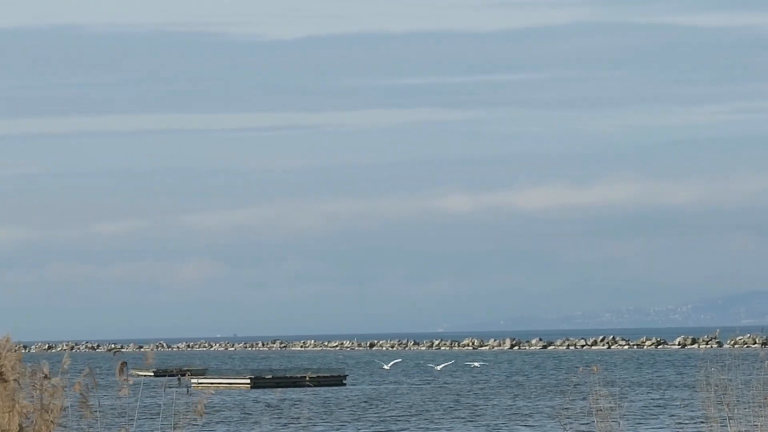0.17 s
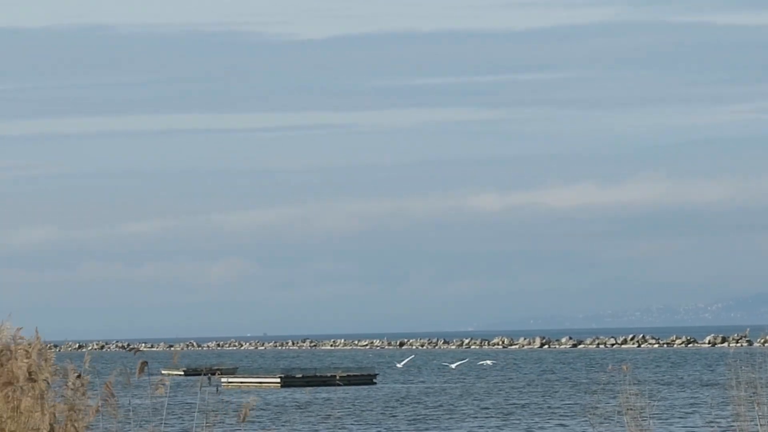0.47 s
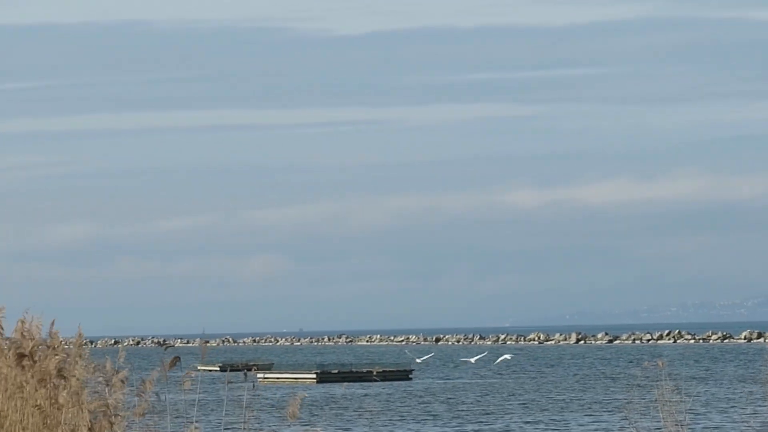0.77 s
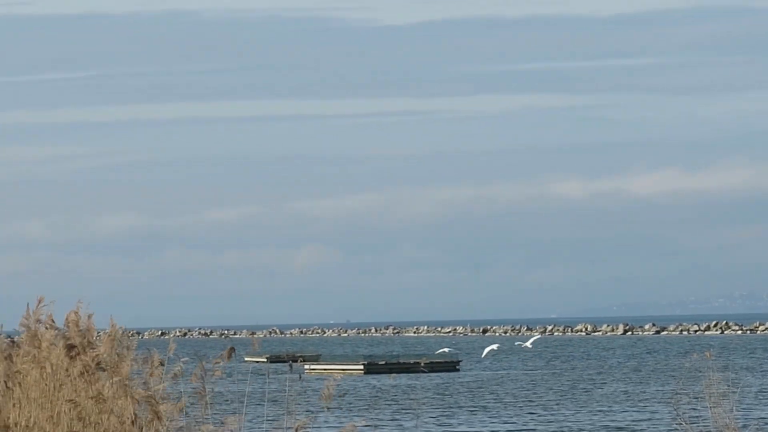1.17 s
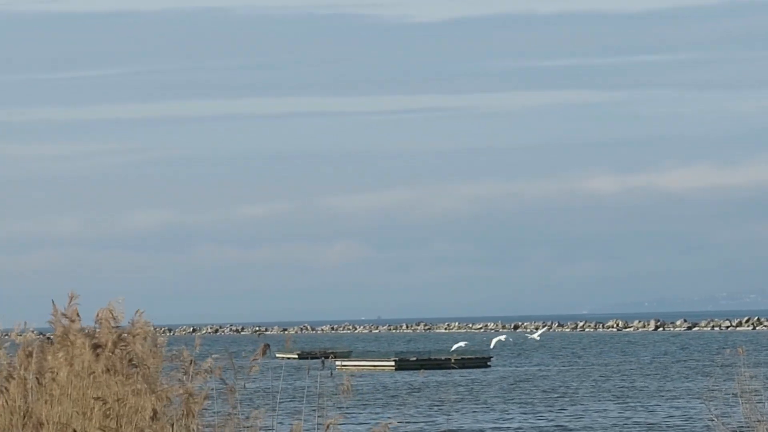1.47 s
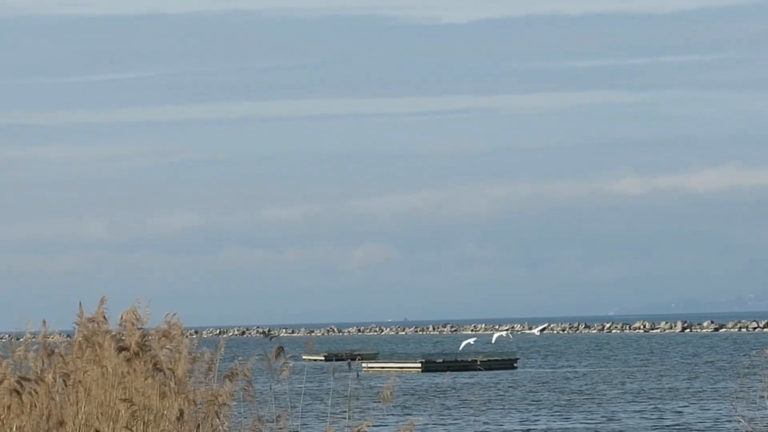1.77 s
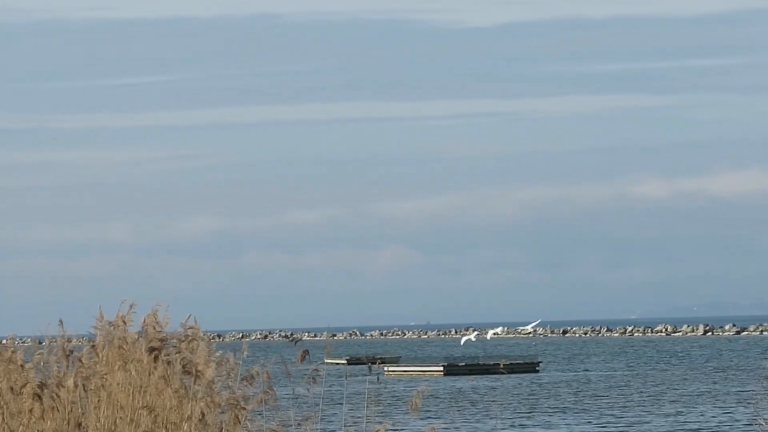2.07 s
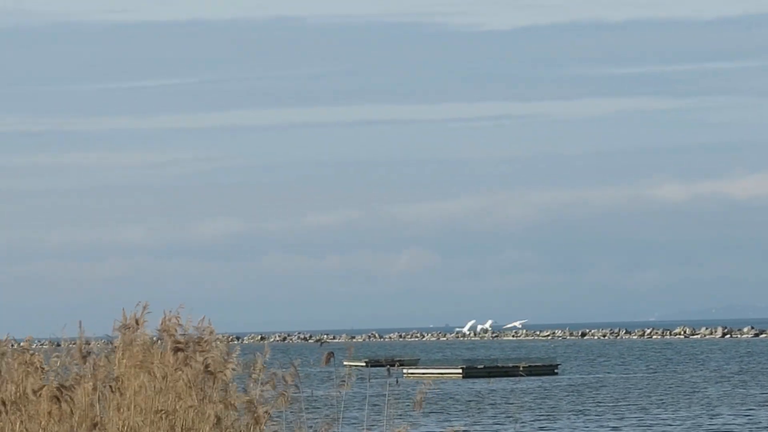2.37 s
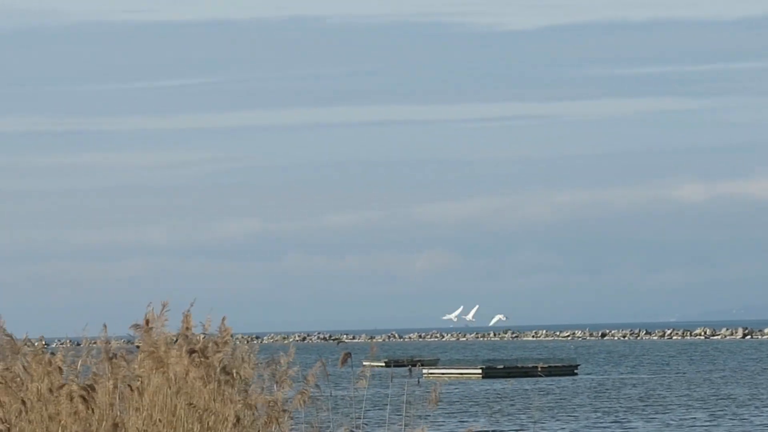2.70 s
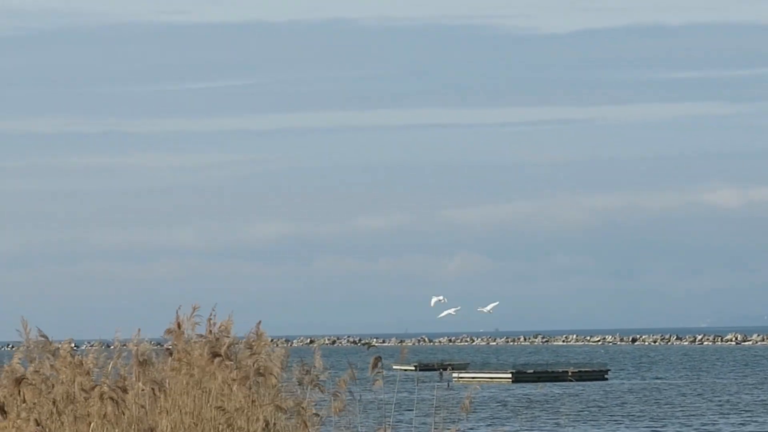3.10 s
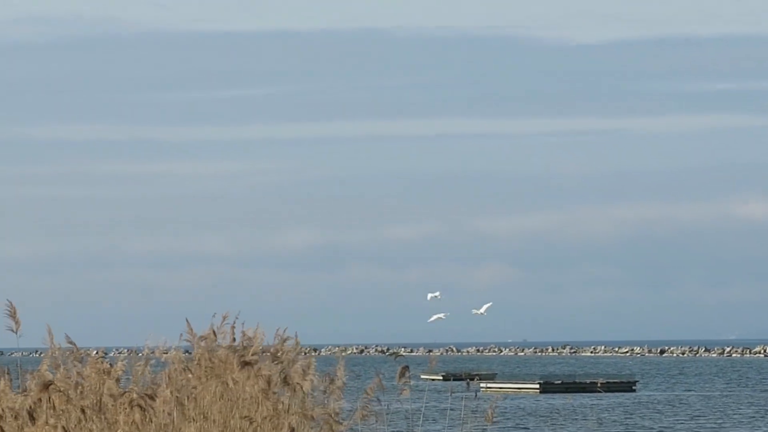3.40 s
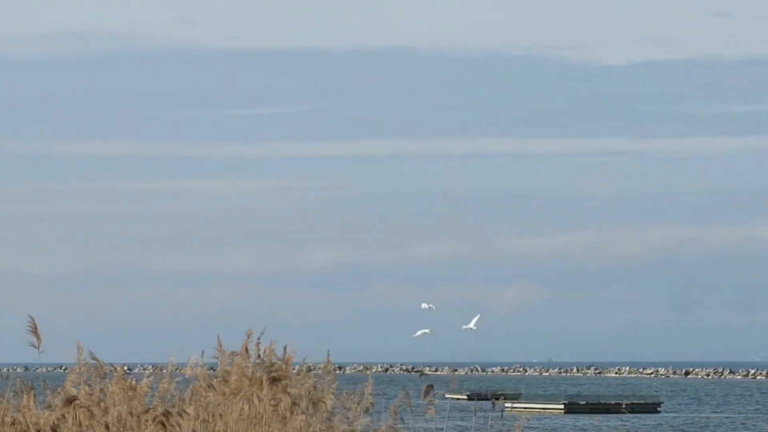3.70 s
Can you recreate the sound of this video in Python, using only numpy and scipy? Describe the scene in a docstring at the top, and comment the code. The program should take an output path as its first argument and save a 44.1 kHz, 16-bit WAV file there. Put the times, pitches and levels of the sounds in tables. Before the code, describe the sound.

Wind rumbles deep and unevenly on a close camera microphone at a lakeshore, thumping near 0.15, 1.0-1.25 and 2.9-3.2 seconds and easing between. Soft bubbling laps and light splashes continue over airy hiss. A far bird gives faint, single falling chips about every half second. A fine, rapid camera buzz persists, with small handling ticks and gritty lens whirs at 1.5 and 2.9-3.3 seconds.

```python
"""Light wind on a lake shore: eddies of shaped noise buffet the microphone, and strong gusts flutter and thump.
Small waves lap as a bubbling wash and splash noise; a far bird gives single chips, gliding pure tones.
The camera buzzes with fast bursts of tiny ticks that ring its body; twice its lens motor whirs, as gritty
noise, and the bursts double. A few soft handling ticks sound close by over steady air roar and hiss."""
import sys
import numpy as np
from scipy import signal
from scipy.fft import rfft, irfft, next_fast_len
from scipy.io import wavfile
from scipy.ndimage import uniform_filter1d, map_coordinates

SR = 44100
rng = np.random.default_rng(int(sys.argv[2]) if len(sys.argv) > 2 else 0)


def inscribe(sig):
    """Save sig as 16-bit PCM at rate SR to the path in sys.argv[1].

    A 1-D sig is mono; a 2-D sig holds one channel per row.
    Samples are clipped to [-1, 1] before scaling.
    """
    pcm = np.round(np.clip(np.atleast_2d(sig).T, -1, 1) * 32767)
    wavfile.write(sys.argv[1], SR, pcm.astype(np.int16))


N = 169785

# Even roar of the open air: (frequency [Hz], relative density [dB])
AIR_SPECTRUM = [(30, 1.5), (90, 0.5), (150, -1), (230, -12), (330, -12), (600, -22), (2000, -72)]
AIR_DB = -35
# Steady hiss of reeds and microphone: (frequency [Hz], relative density [dB])
HISS_SPECTRUM = [(300, -2), (2000, -11), (3000, 1.5), (3800, -0.5), (4500, 4), (5100, 4.5), (6000, 2.5),
                 (9500, 0), (12000, -2), (13300, 1), (14300, -23), (16000, -21)]
HISS_DB = -50.5

# Handling ticks: (time [s], level before rise and decay [dB], t60 [s])
HANDLING_TICKS = [(.152, -38, .08), (0.243, -31.5, 0.053), (.432, -38.5, .09), (.547, -36, 0.09),
                  (1.012, -37, .09), (1.252, -40, .06), (1.3443, -31.5, 0.041), (1.473, -36, .06),
                  (1.503, -34, .08), (1.543, -29, 0.042), (1.8, -36, 0.075), (1.883, -35.5, .08),
                  (2.3256, -38.5, .09), (2.445, -36, 0.12), (2.914, -33.5, 0.085), (3.15, -37, .05),
                  (3.183, -38, .08), (3.245, -32, .035), (3.645, -37, 0.073)]
# Handling colour: (frequency [Hz], relative density [dB])
HANDLING_SPECTRUM = [(300, -32), (900, 7), (2200, 10), (3200, -3), (5000, -15), (12000, -22)]
HANDLING_RISE_S = 0.0012
# Grit in the motor whir and the handling ticks; level relative to their noise
CRACKLES_PER_S, CRACKLE_DB = 420, -4.5

# Lens motor runs: (start [s], end [s], whir level [dB], delay of the second burst [s])
MOTOR_RUNS = [(1.469, 1.563, -38, 0.0034), (2.905, 3.269, -47.5, .003964)]
# Whir colour: (frequency [Hz], relative density [dB])
WHIR_SPECTRUM = [(250, -8), (600, 13), (1000, 7), (1350, -2.5), (1750, 6.5), (2500, 1.5), (3000, -9),
                 (5000, -7.5), (8000, -11), (15000, -36)]

# Tick level of the buzz: (time [s], level [dB])
BUZZ_LEVELS = [(0, -43.5), (.26, -45.5), (.28, -45.5), (1.46, -46.5), (1.58, -42.5), (2.9, -43.5),
               (3.28, -45.5), (3.65, -47.5), (3.85, -52)]
# Tick colour: (frequency [Hz], gain [dB])
TICK_SPECTRUM = [(700, -17), (1800, -2), (2500, -2.5), (3200, -10), (4500, -34), (5300, 0), (8200, -1),
                 (9500, -2), (10800, 0), (12000, -0.5), (13400, 2), (15800, 1)]
# Body resonances struck by every burst: (frequency [Hz], level with the motor off [dB], t60 [s])
BODY_MODES = [(2580, -63, 0.013), (4137, -59.5, 0.021), (4920, -58, .011), (5130, -57, 0.011),
              (5280, -62, 0.023), (8590, -57, 0.0074), (10960, -56, .0032), (13130, -54, 0.004)]
BURST_HZ, FIRST_BURST_S, BURST_JITTER_S = 126.133, .0029, 4e-6
TICK_HZ, TICK_SCATTER_DB = 2659, 2.06
LONE_TICK_DELAY_S, LONE_TICK_DB = 0.0024, -1  # from the burst start; relative to a burst tick
MOTOR_RING_GAIN_DB = 0.5  # body rings harder while the motor runs

# Bird chips: (time at top of arch [s], peak level [dB], top pitch [Hz], length of fall [s])
BIRD_CHIPS = [(.391, -41.5, 3360, .015), (.871, -40.5, 3320, 0.025), (1.481, -45, 3500, .014),
              (1.748, -40.5, 3520, 0.027), (2.124, -43, 3270, .014), (2.291, -40.5, 3375, .015),
              (2.77, -39, 3330, 0.026), (3.025, -42, 3350, .014), (3.503, -40.5, 3330, 0.031)]
CHIP_RISE_S = .013
CHIP_SAG_HZ, CHIP_SAG_S = 140, .01  # pitch drop at this time from the top
CHIP_SCATTER_DB, CHIP_SCATTER_T60_S = -12, .2

# Lapping waves: (crest time [s], wash level added [dB], splash level added [dB], half length [s])
WAVE_LAPS = [(0.028, -37, -45, 0.042), (0.196, -39, -44.5, 0.12), (0.46, -37, -47, 0.066),
             (0.767, -43, -47, 0.15), (1.056, -37.5, -46, 0.086), (1.285, -42, -46.5, 0.08),
             (1.51, -34.5, -41.5, 0.076), (1.74, -37, -45.5, 0.081), (1.898, -33.5, -45.5, 0.048),
             (2.063, -39, -45.5, 0.15), (2.34, -36, -45.5, 0.11), (2.66, -38, -45.5, 0.16),
             (2.993, -33, -42, 0.1), (3.18, -36.5, -42, 0.073), (3.377, -42, -48, 0.16),
             (3.664, -39.5, -45.5, 0.064)]
# Hollow wash: (frequency [Hz], relative density [dB])
WASH_SPECTRUM = [(120, -8), (260, -5), (400, -4), (520, -4.5), (640, 1.5), (760, -0.5), (1000, -2.5),
                 (1400, -9.5), (2200, -49), (5000, -69)]
# Bright splash: (frequency [Hz], relative density [dB])
SPLASH_SPECTRUM = [(600, -6), (1100, -1.5), (1500, 3.5), (2200, -1), (3000, -9), (4500, -12), (9000, -17)]
WASH_REST_DB, SPLASH_REST_DB = -39, -51  # between crests
BUBBLES_DB = -17.5  # relative to the wash noise, before colouring

# Single buffets: (time [s], peak level before the puff [dB], pitch [Hz])
WIND_THUMPS = [(.035, -17, 42), (.148, -11.5, 62), (1.006, -16, 55.3), (1.085, -15, 60), (1.25, -12.5, 65),
               (2.259, -18, 71), (2.943, -12, 44.4), (3.035, -15, 49), (3.153, -9, 56), (3.639, -15, 55),
               (3.721, -17.5, 61.6)]
THUMP_HALF_S, PUFF_DB = 0.018, -16.5  # puff is relative to the thump

# Wind at the microphone: (time [s], level before BUFFET_GAIN_DB [dB])
GUST_LEVELS = [(0, -23), (.04, -16), (.085, -23), (.145, -16.5), (.2, -27), (.27, -24), (.35, -21),
               (.4, -24.5), (.5, -24.5), (.62, -25.5), (.72, -24), (.85, -28.5), (.9, -21), (.95, -32),
               (1.0, -22.5), (1.08, -21.5), (1.14, -18.5), (1.195, -23.5), (1.245, -17.5), (1.31, -28),
               (1.38, -24), (1.46, -27.5), (1.54, -25.5), (1.61, -35.5), (1.69, -28), (1.88, -30.5),
               (2.05, -25.5), (2.24, -21.5), (2.38, -20.5), (2.54, -26), (2.85, -25.5), (2.9, -18),
               (2.945, -21.5), (2.99, -17), (3.09, -16.5), (3.155, -21), (3.23, -19.5), (3.28, -26),
               (3.43, -27.5), (3.54, -26), (3.59, -27), (3.65, -23), (3.77, -24), (3.85, -30.5)]
# Buffeting: (frequency [Hz], relative density [dB])
RUMBLE_SPECTRUM = [(8, -15), (20, 2), (30, 2.5), (45, -5.5), (72, -0.5), (100, -11), (145, -18),
                   (210, -26.5), (320, -37), (700, -46), (2000, -99)]
# Higher flutter of strong gusts: (frequency [Hz], relative density [dB])
FLUTTER_SPECTRUM = [(50, -18), (90, 1), (140, -2), (200, -8), (280, -21.5), (700, -60)]
BUFFET_GAIN_DB, LUMP_DB, LUMPS_PER_S = 1.5, 2, 13
FLUTTER_DB, FLUTTER_DB_PER_GUST_DB = -38, 1.52
FLUTTER_SWING_DB, FLUTTERS_PER_S = 1.5, 14

DIP_S, DIP_WIDTH_S, DIP_DEPTH = .2705, .0048, .85  # depth as a fraction of amplitude
TOP_HZ = 15850


def amp(db):
    """Decibels to gain."""
    return 10 ** (np.asarray(db) / 20)


def unit(x):
    """Scale to rms 1."""
    return x / np.sqrt(np.mean(x ** 2) + 1e-20)


def clock():
    """Time of every sample [s]."""
    return np.arange(N) / SR


def curves(rows):
    """Per-sample line through each column after the time."""
    time_s, *columns = np.transpose(rows)
    return [np.interp(clock(), time_s, column) for column in columns]


def wobble(knots_per_s):
    """Smooth random curve through normal-distributed knots."""
    knots = rng.standard_normal(int(N * knots_per_s / SR) + 4)
    return map_coordinates(knots, [clock() * knots_per_s])


def filtered(x, response):
    """x times a response of frequency, zero-padded."""
    size = next_fast_len(N + SR // 2)
    hz = np.fft.rfftfreq(size, 1 / SR)
    return irfft(rfft(x, size) * response(hz), size)[:N]


def coloured(x, points):
    """x through (frequency [Hz], gain [dB]) points on a log axis, at rms 1."""
    point_hz, db = np.transpose(points)

    def response(hz):
        return amp(np.interp(np.log(hz + 1), np.log(point_hz + 1), db))

    return unit(filtered(x, response))


def noise(points):
    """Coloured noise of rms 1."""
    return coloured(rng.standard_normal(N), points)


def crackling(points):
    """Coloured noise strewn with tiny uneven clicks, at rms 1."""
    clicks = (rng.random(N) < CRACKLES_PER_S / SR) * rng.standard_normal(N)
    return coloured(rng.standard_normal(N) + amp(CRACKLE_DB) * unit(clicks), points)


def air_and_hiss():
    """Steady noise floor: low air roar plus high hiss."""
    return amp(AIR_DB) * noise(AIR_SPECTRUM) + amp(HISS_DB) * noise(HISS_SPECTRUM)


def handling():
    """Small crackly ticks and scuffs on the camera body: quick rise, exponential decay."""
    envelope = np.zeros(N)
    for time_s, db, t60_s in HANDLING_TICKS:
        age_s = np.maximum(clock() - time_s, 0)
        envelope += (1 - np.exp(-age_s / HANDLING_RISE_S)) * amp(db - 60 * age_s / t60_s)
    return envelope * crackling(HANDLING_SPECTRUM)


def lens_motor(ramp_s=0.0048, flutter_db=2.0):
    """Dry, gritty whir that switches on and off with short ramps."""
    t = clock()
    running = np.zeros(N)
    for start_s, end_s, db, _ in MOTOR_RUNS:
        running += amp(db) * np.clip(np.minimum(t - start_s, end_s - t) / ramp_s + .5, 0, 1)
    return running * amp(flutter_db * wobble(60)) * crackling(WHIR_SPECTRUM)


def spikes(times_s, size=16):
    """Band-limited impulses of slightly uneven strength."""
    at = np.ravel(times_s)[:, None] * SR
    index = at.astype(int) + np.arange(size) - size // 2 + 1
    shape = np.sinc(index - at) * np.cos(np.pi * (index - at) / size) ** 2
    strength = amp(TICK_SCATTER_DB * rng.standard_normal(at.shape))
    return np.bincount(np.abs(index).ravel(), (shape * strength).ravel(), N)[:N]


def burst_times():
    """Regular burst starts [s], with a delayed second burst for each while the motor runs."""
    regular = FIRST_BURST_S + np.arange(int(N / SR * BURST_HZ)) / BURST_HZ
    groups = [regular]
    for start_s, end_s, _, delay_s in MOTOR_RUNS:
        groups.append(regular[(regular > start_s) & (regular < end_s)] + delay_s)
    times_s = np.concatenate(groups)
    return times_s + BURST_JITTER_S * rng.standard_normal(len(times_s))


def body_ring(bursts_s):
    """Each burst strikes the damped resonances of the camera body."""
    blows, t = spikes(bursts_s), np.arange(SR // 20) / SR
    ring = np.zeros(N)
    for hz, db, t60_s in BODY_MODES:
        mode = np.sin(2 * np.pi * hz * t) * amp(-60 * t / t60_s)
        ring += amp(db) * unit(signal.fftconvolve(blows, mode)[:N])
    motor_on = sum((clock() > start_s) & (clock() < end_s) for start_s, end_s, _, _ in MOTOR_RUNS)
    return ring * amp(MOTOR_RING_GAIN_DB * motor_on)


def camera_buzz(count=4):
    """Each burst is a quick run of ticks and one lone tick, and it rings the body."""
    bursts_s = burst_times()
    runs = spikes(bursts_s[:, None] + np.arange(count) / TICK_HZ)
    ticks = runs + amp(LONE_TICK_DB) * spikes(bursts_s + LONE_TICK_DELAY_S)
    level_db, = curves(BUZZ_LEVELS)
    return amp(level_db) * coloured(ticks, TICK_SPECTRUM) + body_ring(bursts_s)


def bird():
    """Each chip is a pure tone that arches over and falls away, blurred by its way across the shore."""
    song = np.zeros(N)
    for time_s, db, top_hz, fall_s in BIRD_CHIPS:
        t = clock() - time_s
        phase = np.clip(np.where(t < 0, t / CHIP_RISE_S, t / fall_s), -1, 1)
        envelope = np.cos(np.pi * phase / 2) ** 2
        hz = top_hz - CHIP_SAG_HZ * (np.clip(t, -CHIP_RISE_S, fall_s) / CHIP_SAG_S) ** 2
        song += amp(db) * envelope * np.sin(2 * np.pi * np.cumsum(hz) / SR)
    tail = rng.standard_normal(SR // 2) * amp(-60 * clock()[:SR // 2] / CHIP_SCATTER_T60_S)
    scatter = signal.fftconvolve(song, tail / np.linalg.norm(tail))[:N]
    return song + amp(CHIP_SCATTER_DB) * scatter


def bubbles(low_hz, high_hz, cycles, spread_db, count, size=900):
    """Scattered short damped rings that rise a little in pitch."""
    when, pitch, chance = rng.random((count, 3)).T[:, :, None]
    turns = low_hz * (high_hz / low_hz) ** pitch * np.arange(size) / SR
    age = turns / cycles
    strength = amp(-spread_db * np.log(.03 + chance))
    rings = strength * age * np.exp(-4 * age) * np.sin(2 * np.pi * turns * (1 + .06 * age))
    index = (when * N).astype(int) + np.arange(size)
    return np.bincount(index.ravel(), rings.ravel(), N)[:N]


def water():
    """Small waves swell and ebb: a hollow, bubbling wash and a brighter splash."""
    crest_s, wash_db, splash_db, half_s = np.transpose(WAVE_LAPS)[:, :, None]
    swells = np.exp(-((clock() - crest_s) / half_s) ** 2)

    def level(rest_db, crest_db):  # powers add
        return np.sqrt(amp(rest_db) ** 2 + np.sum(amp(crest_db) ** 2 * swells, axis=0))

    bubbling = unit(bubbles(394.5, 1310, cycles=11.7, spread_db=-1, count=900))
    wash = coloured(rng.standard_normal(N) + amp(BUBBLES_DB) * bubbling, WASH_SPECTRUM)
    splash = noise(SPLASH_SPECTRUM)
    return level(WASH_REST_DB, wash_db) * wash + level(SPLASH_REST_DB, splash_db) * splash


def thumps():
    """A large eddy shoves the microphone through a few deep swings, with a puff of flutter."""
    out, puff = np.zeros(N), amp(PUFF_DB) * noise(FLUTTER_SPECTRUM)
    start_turns = rng.random(len(WIND_THUMPS))
    for (time_s, db, hz), start in zip(WIND_THUMPS, start_turns):
        t = clock() - time_s
        swing = np.sin(2 * np.pi * (hz * t + start))
        out += amp(db) * np.exp(-(t / THUMP_HALF_S) ** 2) * (swing + puff)
    return out


def wind():
    """Eddies buffet the microphone at the gust level; strong gusts add a higher, ragged flutter."""
    gust_db, = curves(GUST_LEVELS)
    eddies = noise(RUMBLE_SPECTRUM)
    local_power = np.abs(uniform_filter1d(eddies ** 2, size=2200))
    steady = eddies / np.sqrt(local_power + 1e-6)  # evened out, so the gusts set the level
    lumpy = unit(steady * amp(LUMP_DB * wobble(LUMPS_PER_S)))
    rumble = amp(gust_db + BUFFET_GAIN_DB) * lumpy
    flutter_db = FLUTTER_DB_PER_GUST_DB * gust_db + FLUTTER_SWING_DB * wobble(FLUTTERS_PER_S)
    flutter = unit(amp(flutter_db) * noise(FLUTTER_SPECTRUM))
    return rumble + amp(FLUTTER_DB) * flutter


def scene():
    """Shore and camera at one microphone."""
    camera = handling() + lens_motor() + camera_buzz()
    shore = air_and_hiss() + bird() + water() + thumps() + wind()
    return (camera + shore)[None]


def record(dry):
    """The level dips once, briefly; nothing is kept above the band limit."""
    dip = 1 - DIP_DEPTH * np.exp(-((clock() - DIP_S) / DIP_WIDTH_S) ** 2)
    return filtered(dry[0] * dip, lambda hz: hz < TOP_HZ)[None]


dry = scene()
out = record(dry)
inscribe(out)
```